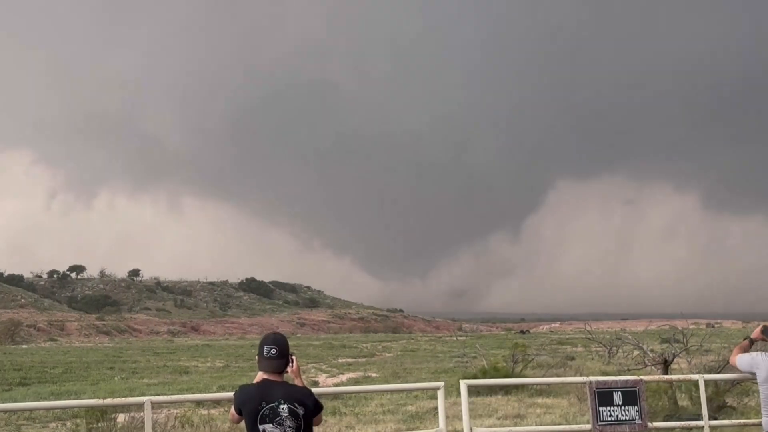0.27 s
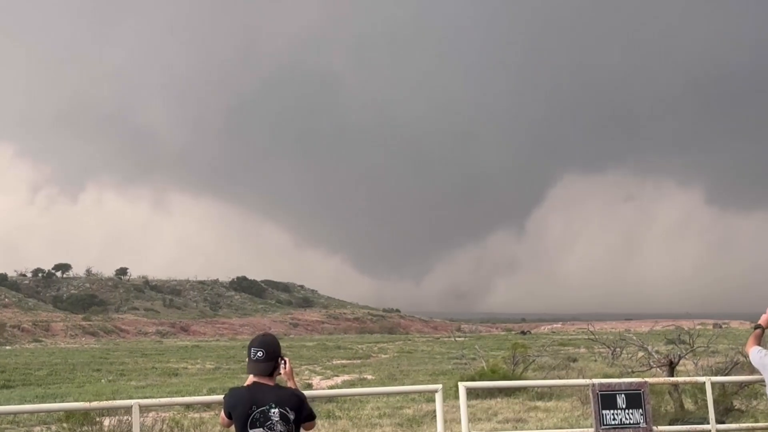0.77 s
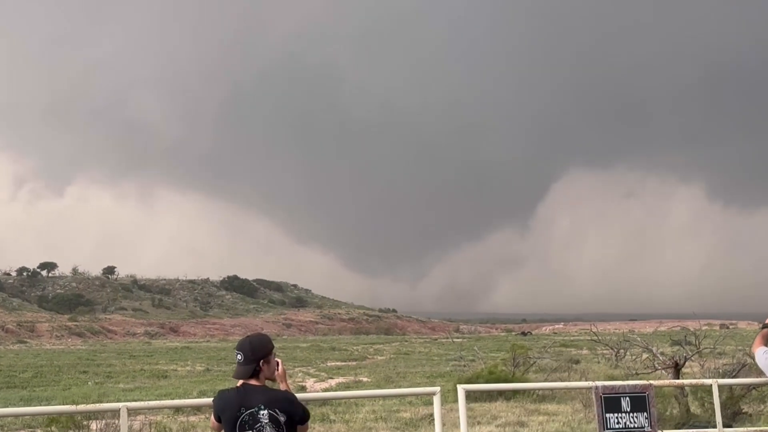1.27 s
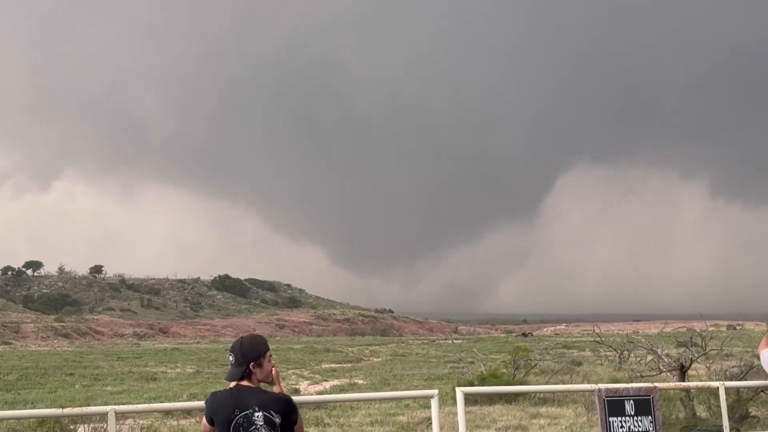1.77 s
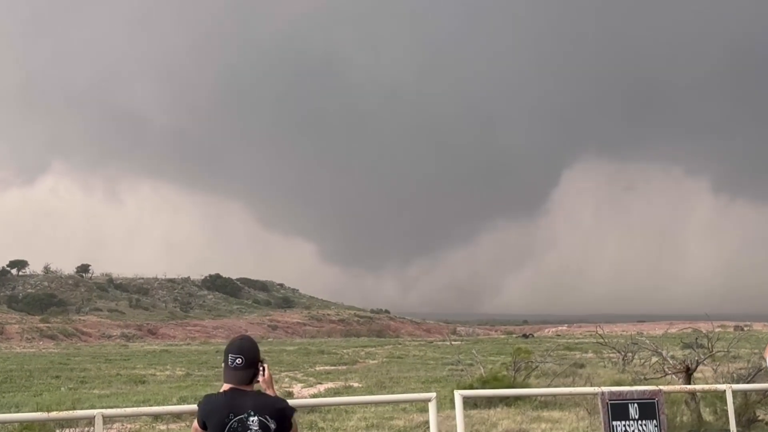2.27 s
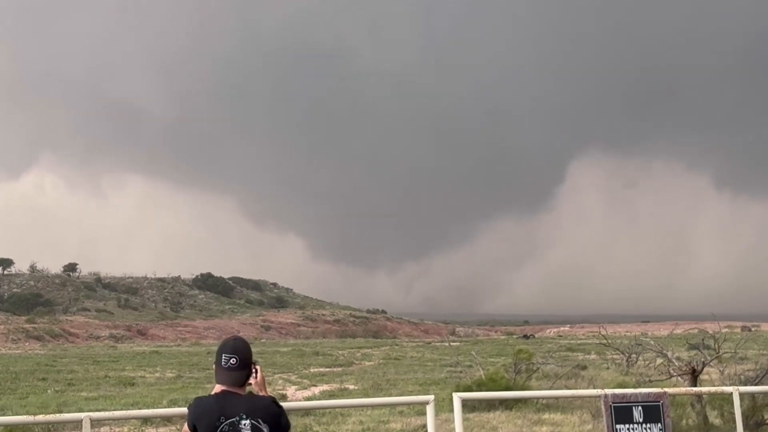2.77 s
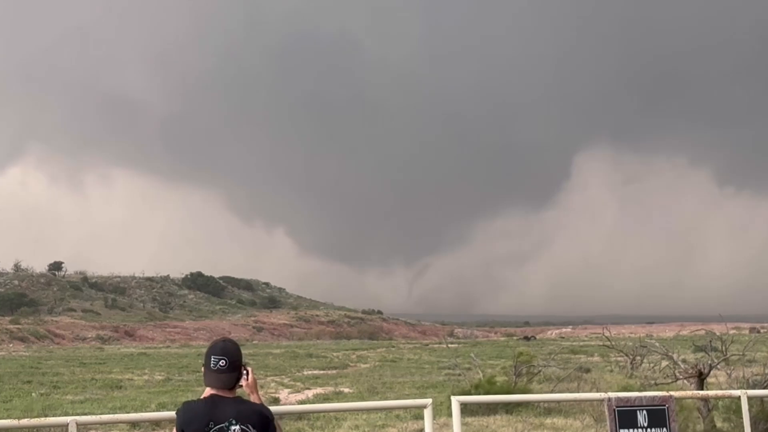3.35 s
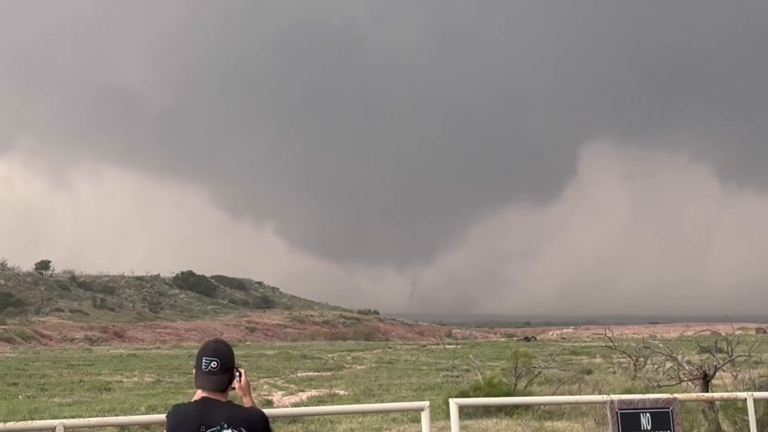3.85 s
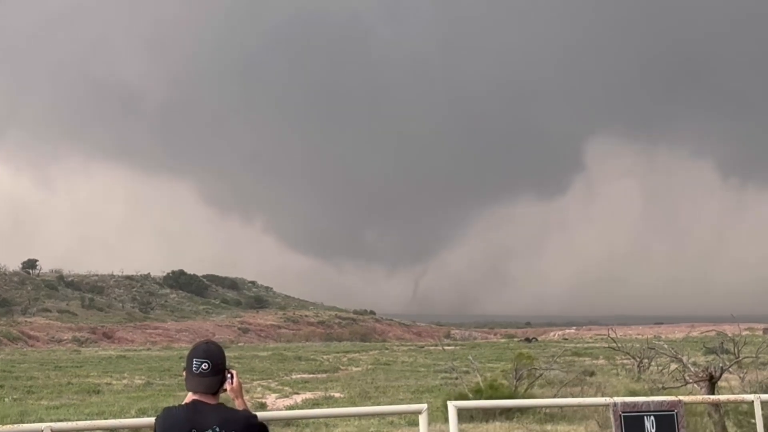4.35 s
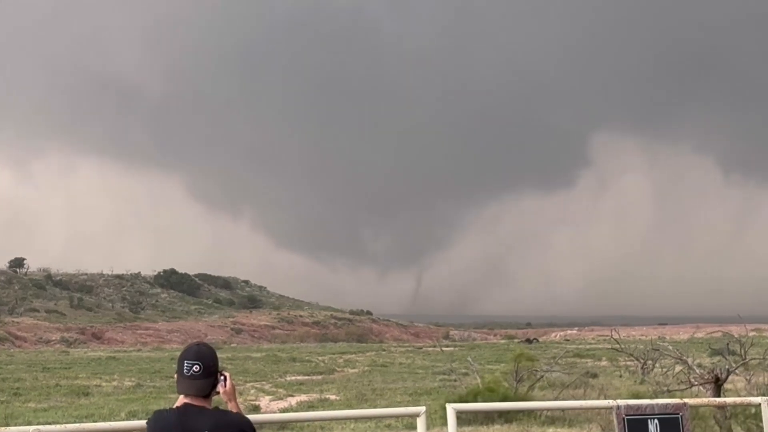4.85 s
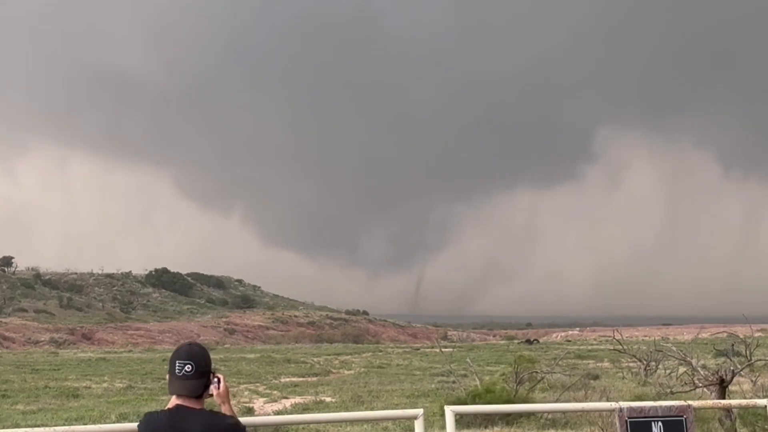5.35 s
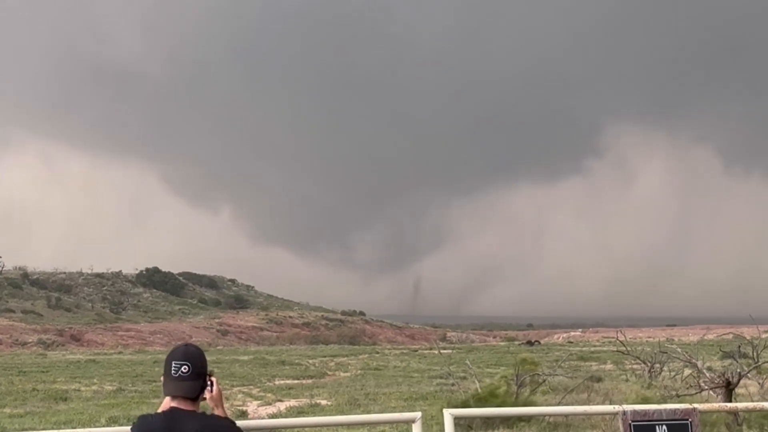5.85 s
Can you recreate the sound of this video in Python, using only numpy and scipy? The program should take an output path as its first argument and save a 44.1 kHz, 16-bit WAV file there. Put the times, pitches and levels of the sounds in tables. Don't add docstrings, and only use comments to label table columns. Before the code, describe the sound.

Low, booming wind noise on an open grassy plain, swelling into crackling thumps, with faint grass hiss and small knocks on the microphone housing.

```python
import sys
import numpy as np
from scipy import signal
from scipy.fft import rfft, irfft
from scipy.io import wavfile
from scipy.ndimage import uniform_filter1d

SR = 44100
rng = np.random.default_rng(int(sys.argv[2]) if len(sys.argv) > 2 else 0)


def boost(x):
    u = np.asarray(x, float) / 20
    return 10 ** u


def persist_wave(psi):
    counts = np.round(np.clip(psi, -1, 1) * 32767).astype(np.int16)
    wavfile.write(sys.argv[1], SR, np.atleast_2d(counts).T)


N = 269010

# t/s, hiss level/dB, brightness/dB
GRASS = [(0.0, -49.5, 7), (0.37, -53.5, 4.5), (0.71, -51.5, 5), (1.58, -57.5, 5), (2.45, -52, 4.5),
         (2.6, -51, 3), (2.97, -48, 5), (3.17, -57, 4.5), (3.29, -55.5, 5), (3.36, -49.5, 6.5),
         (3.86, -54.5, 5), (4.03, -56, 5.5), (4.16, -47, 5), (4.35, -53.5, 5), (5.2, -59, 6.5),
         (5.68, -55, 5.5), (5.86, -59.5, 2), (6.1, -54, 5.5)]


def evened(x):
    return x / np.sqrt(np.mean(x ** 2) + 1e-20)


def steadied(x, size):
    return x / np.sqrt(uniform_filter1d((x ** 2).mean(0), size=size) + 0.017)


def read(points, hz):
    f, value = np.transpose(points)
    return np.interp(np.log(hz + 1), np.log(f + 1), value)


def curves(rows, t):
    s, *columns = np.transpose(rows)
    return [np.interp(t, s, column) for column in columns]


def add(mix, s, sound):
    part = mix[:, max(round(s * SR), 0):][:, :sound.shape[1]]
    part += sound[:, :part.shape[1]]


def band(x, lo_hz, hi_hz):
    return signal.sosfilt(signal.butter(3, [lo_hz, hi_hz], "band", fs=SR, output="sos"), x)


def resonate(x, hz, width):
    return signal.lfilter(*signal.iirpeak(hz, hz / width, SR), x)


def blended(a, b, likeness):
    return likeness * a + np.sqrt(1 - likeness ** 2) * b


def gusty(points, size, tilt_db, pivot_hz, patchy_db, flicker_db):
    hop = size // 4
    frames, hz = N // hop + 5, np.fft.rfftfreq(size, 1 / SR)
    t = np.arange(frames) * hop / SR
    draw = rng.standard_normal((frames, len(hz), 5)).T
    patches = uniform_filter1d(draw[4], size=6, axis=0)
    patches = evened(uniform_filter1d(patches, size=6, axis=1))
    flicker = evened(uniform_filter1d(rng.standard_normal(frames), size=3))
    octaves = np.clip(np.log2((hz + 1) / pivot_hz), 0, 2)[:, None]
    colour_db = read(points, hz)[:, None]
    field_db = colour_db + octaves * tilt_db(t) + patchy_db * patches + flicker_db * flicker
    z = (draw[:2] + 1j * draw[2:4]) * boost(field_db)
    return evened(signal.istft(z, nperseg=size, noverlap=size - hop)[1][:, :N])


def ports(pair, likeness=None):
    # f/Hz, likeness/0-1
    port_likeness = [(60, 0.76), (250, 0.67), (600, 0), (1100, 0.16), (1700, 0.58), (2200, 0.81),
                     (4000, 0.74), (4900, 0.94), (7100, 0.9), (8000, 0.69), (16000, 0)]
    # f/Hz, lead/radians
    right_lead = [(30, .05), (120, .35), (500, .5), (1000, 1.1), (1600, .2), (3200, -.45), (5000, 0),
                  (16000, 0)]
    # f/Hz, left over right/dB
    left_db = [(60, -0.15), (300, 1), (1300, 2.5), (2200, 0.5), (16000, -1.5)]
    turn_from_hz, turn_hz = 8020, 3010

    hz = np.fft.rfftfreq(N, 1 / SR)
    if likeness is None:
        a, b = rfft(pair)
        z = np.array([a, blended(a, b, np.clip(read(port_likeness, hz), 0, 1))])
    else:
        z = rfft([pair[0], blended(pair[0], pair[1], np.clip(likeness, 0, 1))])
    lead = read(right_lead, hz) + 2 * np.pi * np.maximum(hz - turn_from_hz, 0) / turn_hz
    half = boost(read(left_db, hz) / 2) * np.exp(-.5j * lead)
    return irfft(z * [half, 1 / half], N)


def wind():
    # t/s, strength/dB
    gust = [(0.0, -29), (0.5, -31), (0.73, -26.5), (1.05, -30), (1.83, -32.5), (2.1, -26), (2.33, -25),
            (2.58, -17), (2.76, -25), (2.87, -20), (3.18, -27), (3.55, -25.5), (3.95, -32), (4.22, -28.5),
            (5.05, -35.5), (5.45, -27.5), (5.68, -28.5), (5.8, -23.5)]
    # t/s, peak level/dB, time to fall 9 dB/s
    surge_rows = [(.15, -14.5, 0.0354), (.39, -27, 0.59), (.56, -17, -0.0056), (.72, -24, 0.32),
                  (0.881, -26.5, 0.02), (1.14, -18.5, 0.0741), (1.42, -18, -0.1384), (1.721, -26.5, 0.1051),
                  (1.918, -16, 0.0659), (2.11, -15.5, -0.01), (2.34, -17, 0.13), (2.48, -22, -0.0256),
                  (2.65, -17, 0.1182), (2.799, -12.5, 0.0812), (2.959, -16.5, 0.0955), (3.13, -24.5, 0.11),
                  (3.27, -18.5, 0.0072), (3.371, -17.5, 0.0281), (3.63, -19, 0.2153), (3.88, -25.5, 0.16),
                  (4.126, -15.5, -0.03), (4.269, -19, 0.0967), (4.5, -28.5, 0.01), (4.72, -16, -0.0441),
                  (4.9, -24, 0.23), (5.21, -21.5, 0.1659), (5.47, -23.5, 0.08), (5.72, -17.5, 0.01),
                  (5.88, -17, -0.043), (6.1, -22.5, 0.16)]
    # f/Hz, level per Hz/dB
    rumble_colour = [(18, -36.5), (30, -14.5), (42, -4), (54, 15.5), (66, 5.5), (80, -8.5), (100, -29.5),
                     (130, -62)]
    # f/Hz, level per Hz/dB
    eddy_colour = [(40, 0), (75, 2), (110, 2), (170, -4), (260, -13), (400, -26.5), (600, -30.5),
                   (700, -49), (1000, -40.5), (1500, -74.5)]
    calm_db = -30
    lull_db, lull_per_db = -32, 0.3421
    sharp_db, dull_per_db = 3.5, 0.3515
    sharp_per_stir, still_db = 0.654, -55
    alike, apart_per_db = 0.868, 0.0447

    def over_calm_db(t):
        return curves(gust, t)[0] - calm_db

    def sharpness_db(t):
        stir_db = curves(GRASS, t)[0] - still_db
        return sharp_db - dull_per_db * over_calm_db(t) + sharp_per_stir * stir_db

    t = np.arange(N) / SR
    over_db = over_calm_db(t)
    surges = sum(boost(db) ** 2 * np.exp(-2 * ((t - s) / width) ** 2) for s, db, width in surge_rows)
    level = np.sqrt(boost(lull_db + lull_per_db * over_db) ** 2 + surges)
    rumble = gusty(rumble_colour, size=4096, tilt_db=np.zeros_like, pivot_hz=60,
                   patchy_db=-0.48, flicker_db=-2.26)
    rumble = ports(level * steadied(rumble, size=2400), likeness=.985)
    eddies = gusty(eddy_colour, size=1024, tilt_db=sharpness_db, pivot_hz=194.5,
                   patchy_db=2.0, flicker_db=0.68)
    lumps = boost(calm_db + over_db + 3.5) * steadied(eddies, size=3500)
    return rumble + ports(lumps, alike - apart_per_db * over_db)


def grass():
    # f/Hz, level per Hz/dB
    hiss_colour = [(200, -14), (500, 8.5), (900, 6), (1300, 4), (1900, -2.5), (2400, -6), (3000, -10),
                   (5000, -19.5), (7500, -24), (9000, -28), (12000, -29.5), (16000, -44)]
    level_db, _ = curves(GRASS, np.arange(N) / SR)
    hiss = gusty(hiss_colour, size=512, tilt_db=lambda t: curves(GRASS, t)[1], pivot_hz=2950,
                 patchy_db=2.0, flicker_db=.5)
    return ports(boost(level_db + 5) * hiss)


def ticks():
    # t/s, rattle peak/dB, hollow knock peak/dB, knock f/Hz
    tick_rows = [(0.015, -39.5, -42, 1096), (0.1186, -39, -41.5, 1456), (0.153, -39, -35.5, 840.7),
                 (0.173, -32.5, -32.5, 952.3), (0.3104, -46.5, -51.5, 982), (0.3895, -47, -54.5, 898),
                 (0.5162, -45.5, -43, 1268), (0.5588, -39.5, -36, 897.2), (0.775, -41.5, -38.5, 1068),
                 (0.8579, -46.5, -47.5, 974), (1.481, -36, -26.5, 1295), (1.5737, -46.5, -46.5, 984),
                 (1.6104, -37.5, -31, 1254), (1.7074, -45.5, -35.5, 990), (1.729, -48, -44, 850.4),
                 (1.8846, -48, -40.5, 911), (2.5692, -45, -42.5, 890), (2.7581, -43.5, -41.5, 829),
                 (2.9398, -47, -37, 795), (3.5404, -31, -26, 862), (3.7228, -47.5, -48.5, 1010),
                 (3.7761, -46, -50.5, 1080), (3.8146, -38, -35, 1395), (3.8499, -47, -41.5, 834),
                 (3.927, -31, -27, 1320), (4.126, -33.5, -35, 875), (4.1367, -45.5, -44, 970),
                 (4.3172, -33, -26.5, 1127), (4.4977, -48.5, -43, 1286), (5.6335, -48.5, -44.5, 1395)]
    # f/Hz, width/Hz, level/dB
    housing = [
        (850, 200, -3),
        (1330, 200, -2),
        (1750, 250, -11),
    ]
    rattle_t60, top_db = 0.101, -17

    out, t = np.zeros((2, N)), np.arange(5000) / SR
    draws = rng.standard_normal((len(tick_rows), 2, len(t)))
    for (s, rattle_db, knock_db, knock_hz), scrape in zip(tick_rows, draws):
        blow = scrape * (1 - np.exp(-t / .001)) * np.exp(-t / .0055)
        hollow = 0
        for hz, width, db in housing + [(knock_hz, 150, 0)]:
            hollow = hollow + boost(db) * resonate(resonate(blow, hz, width), hz, 3 * width)
        hollow = hollow / abs(hollow).max()
        shape = (1 - np.exp(-t / 0.00153)) * boost(-60 * t / rattle_t60)
        rattle = evened(band(scrape, 1960, 7990) + 0.786 * band(scrape, 2024, 4514))
        top = evened(band(scrape, 7200, 13320))
        treble = shape * (rattle + boost(top_db + 7) * top)
        add(out, s - .0015, boost(knock_db + 6.0) * hollow + boost(rattle_db - 5) * treble)
    return ports(out)


def slaps():
    # t/s, peak/dB, thud below 160 Hz/dB, crack above 400 Hz/dB
    slap_rows = [(1.983, -19.5, 2.5, -4.5), (2.095, -14.5, 1, -21.5), (2.139, -25.5, 12, -9),
                 (2.362, -25.5, 16.5, -22), (2.453, -4.5, -2, -7.5), (2.514, -20, 9.5, -14.5),
                 (2.532, -6, -11.5, -13.5), (2.544, -6.5, -4.5, -6), (2.579, -7, -5.5, -8),
                 (2.599, -1, -7, -19), (2.632, -8.5, -5.5, -23.5), (2.702, -24, 2, -5.5),
                 (2.811, -18.5, -0.5, -9.5), (2.864, -6, 4, -8.5), (2.884, -8.5, 7, -2),
                 (2.904, -8, -11.5, -18), (2.968, -14, 4.5, -15), (2.981, -12.5, -6.5, -1.5),
                 (3.018, -17, 0.5, -1), (3.038, -24.5, -1, -3.5), (3.122, -22, 10.5, -25),
                 (3.2, -22.5, -6, -1), (3.233, -17, 2, -7), (3.259, -14.5, 0, -9.5), (5.759, -19, 6, -19),
                 (5.819, -7, -2.5, -9), (5.829, -3, 1, -5.5), (5.87, -11.5, 10.5, -3.5),
                 (5.877, -2, -12, -16.5), (6.005, -14, -5.5, -24.5)]
    # t/s, peak/dB
    puff_rows = [(0.164, -21.5), (.619, -29.5), (2.041, -30.5), (2.214, -21.5), (2.671, -22),
                 (3.877, -33.5), (4.178, -24), (4.253, -24), (5.311, -29.5), (5.422, -27.5), (5.463, -21.5),
                 (5.943, -26), (6.037, -23.5)]
    # low f/Hz, high f/Hz, level/dB, share of the slap's length
    churn_bands = [
        (149.6, 381.3, -4.5, 0.911),
        (423, 635, -4, 0.378),
        (750, 1186, -16.5, 0.256),
    ]
    puff_thud_db, puff_crack_db = 5, -15.5
    slap_s, shorter_per_db = 0.02222, 0.001
    alike = 0.8096

    out, t = np.zeros((2, N)), np.arange(6000) / SR
    rows = slap_rows + [(s, db, puff_thud_db, puff_crack_db) for s, db in puff_rows]
    draws, starts = rng.standard_normal((len(rows), 2, 10000)), rng.random((len(rows), 3))
    for (s, peak_db, thud_db, crack_db), (a, b), start in zip(rows, draws, starts):
        length = slap_s * (1 - shorter_per_db * peak_db)
        pair = np.array([a, blended(a, b, alike)])
        for (lo_hz, hi_hz, db, share), own_db in zip(churn_bands, (0, crack_db, crack_db)):
            rise = 1 - np.exp(-t * lo_hz * 1.219)
            shape = rise ** 2 * np.exp(-(t / (length * share)) ** 2)
            churn = evened(band(pair, lo_hz, hi_hz))
            churn = steadied(churn, size=round(SR / lo_hz))[:, -len(t):]
            add(out, s - .004, boost(peak_db + db + own_db) * shape * churn)
        swing_hz = (72 + 40 * start[2]) + 380 * np.exp(-t / (.25 * length))
        apart = np.array([[0], [np.arccos(alike) * (2 * start[1] - 1)]])
        swing = np.sin(2 * np.pi * (np.cumsum(swing_hz) / SR + start[0]) + apart)
        shape = (1 - np.exp(-t / (0.346 * length))) ** 2 * np.exp(-(t / (1.11 * length)) ** 3)
        add(out, s - .004, boost(peak_db + thud_db + 2.5) * shape * swing)
    soft = signal.butter(6, 1250, fs=SR, output="sos")
    above_45_hz = signal.butter(2, 45, "high", fs=SR, output="sos")
    return ports(signal.sosfilt(np.vstack([soft, above_45_hz]), out), likeness=0)


def bird():
    # t/s, length/s, from f/Hz, to f/Hz, level/dB
    bird_notes = [
        (4.505, .075, 3860, 3790, -64),
        (4.505, .02, 2925, 2940, -62.5),
        (4.574, .03, 4047, 4035, -65),
        (4.57, .1, 4380, 4650, -67.5),
        (5.93, .03, 4040, 4020, -69.5),
        (5.982, .115, 3960, 4086, -66.5),
        (6.014, .07, 3050, 2850, -68.5),
    ]
    out = np.zeros((2, N))
    for (s, length, from_hz, to_hz, db), draw in zip(bird_notes, rng.standard_normal((len(bird_notes), 8000))):
        u = np.linspace(0, 1, round(length * SR))
        waver = evened(uniform_filter1d(draw, size=400))[:len(u)]
        hz = from_hz + (to_hz - from_hz) * u + 70 * waver
        broken = evened(uniform_filter1d(draw[::-1], size=110))[:len(u)]
        shape = abs(np.sin(np.pi * u)) ** .5 * (.3 + 0.84 * broken)
        note = shape * np.sin(2 * np.pi * np.cumsum(hz) / SR)
        add(out, s, boost(db + 4.22) * np.array([note, note]))
    return out


def scene():
    return wind() + slaps() + grass() + ticks() + bird()


def joint_stereo(x, from_hz, edge_hz):
    # f/Hz, margin/dB
    joint_margin = [(1900, 9), (8200, 9), (8500, 4), (16000, 4)]
    frame = dict(nperseg=2048, noverlap=1024, window="cosine")
    hz, _, z = signal.stft(np.array([x[0] + x[1], x[0] - x[1]]) / 2, SR, **frame)
    hz = hz[:1024, None]
    power = abs(z[:, :1024]).reshape(2, 128, 8, -1) ** 2
    power = np.repeat(uniform_filter1d(power.sum(2), size=3, axis=2), 8, axis=1)
    kept = (power > boost(-2 * read(joint_margin, hz)) * power[::-1]) | (hz < from_hz)
    z[:, :1024] *= kept & (hz < edge_hz) & (hz > SR / 2048 / 2)
    mid, side = signal.istft(z, SR, **frame)[1][:, :N]
    return np.array([mid + side, mid - side])


def band_limit(x):
    return signal.sosfilt(signal.butter(12, 15820, fs=SR, output="sos"), x)


def record(dry):
    ceiling = 1.15
    limited = ceiling * np.tanh(dry / ceiling)
    edge_hz = np.array([15200, 15800])[:, None, None]
    mix = joint_stereo(limited, from_hz=1900, edge_hz=edge_hz)
    return band_limit(mix)


dry = scene()
out = record(dry)
persist_wave(out)
```